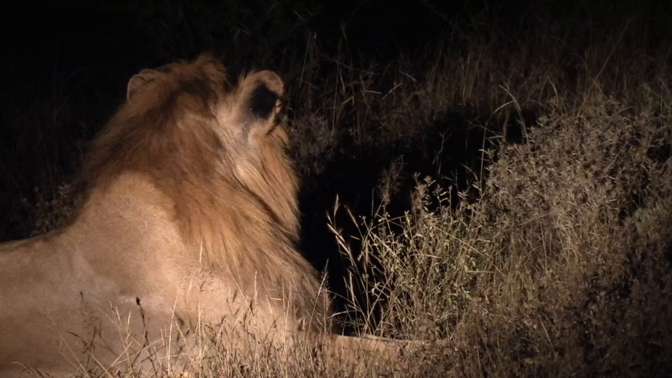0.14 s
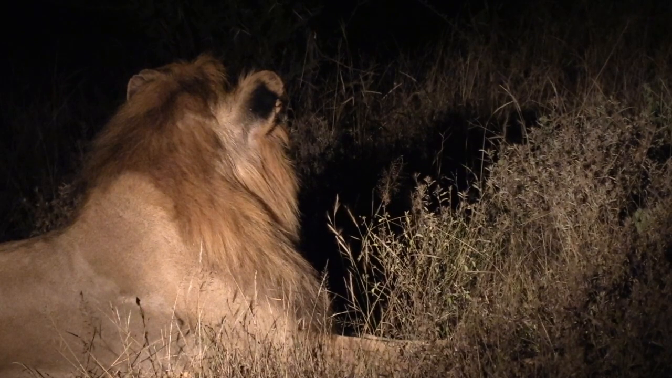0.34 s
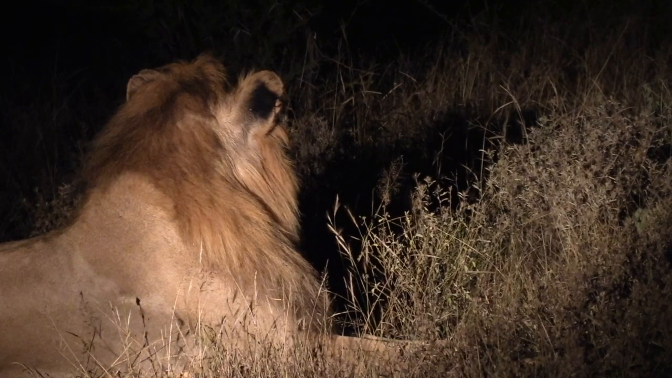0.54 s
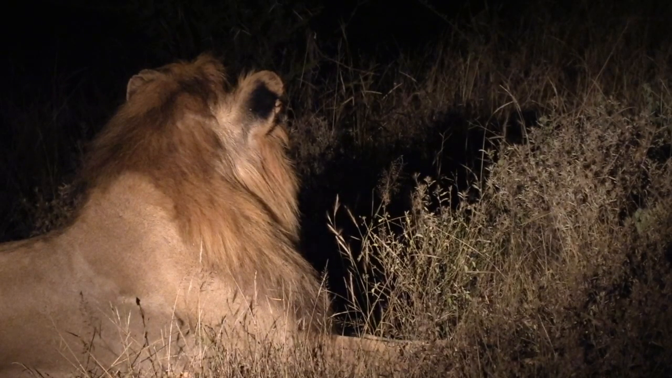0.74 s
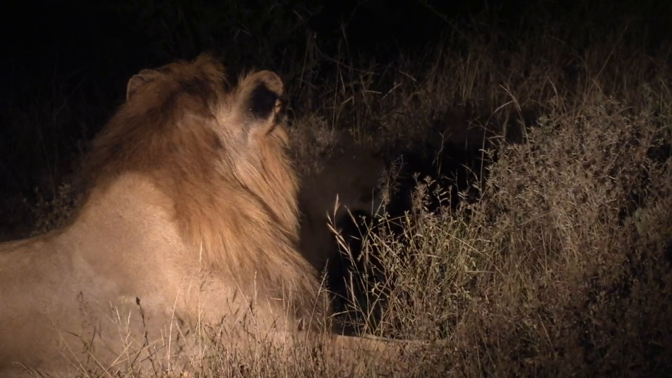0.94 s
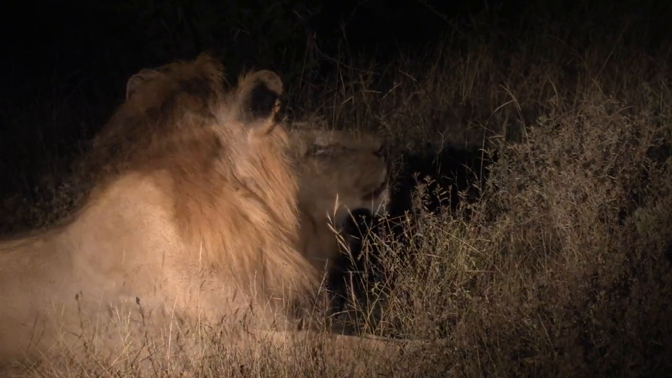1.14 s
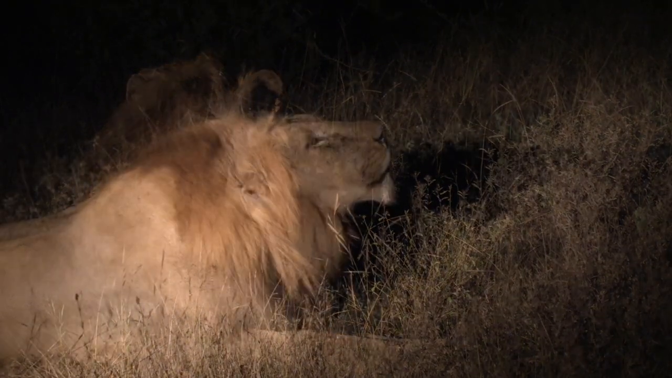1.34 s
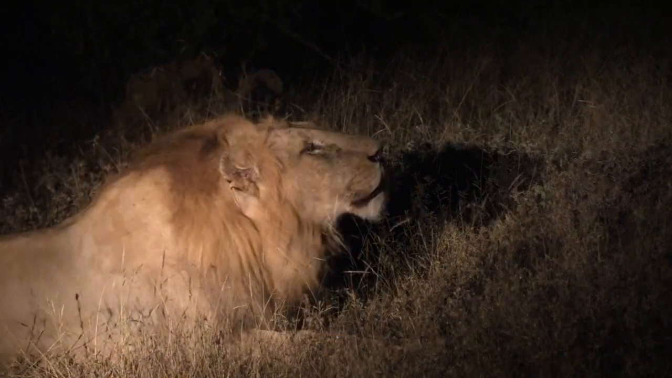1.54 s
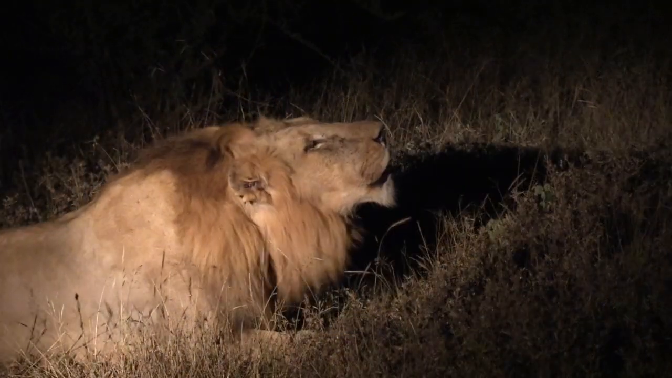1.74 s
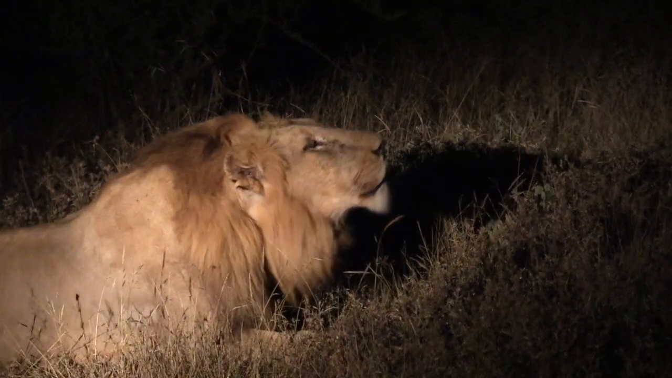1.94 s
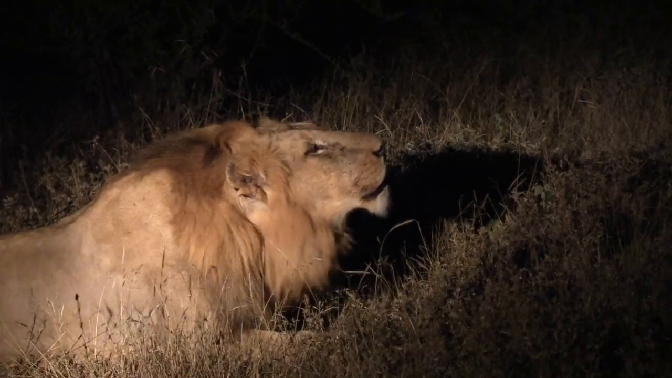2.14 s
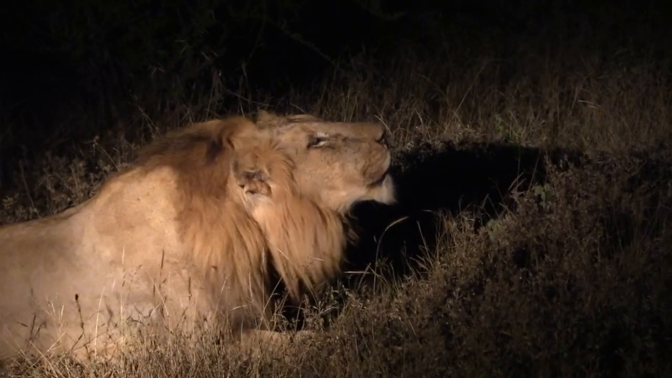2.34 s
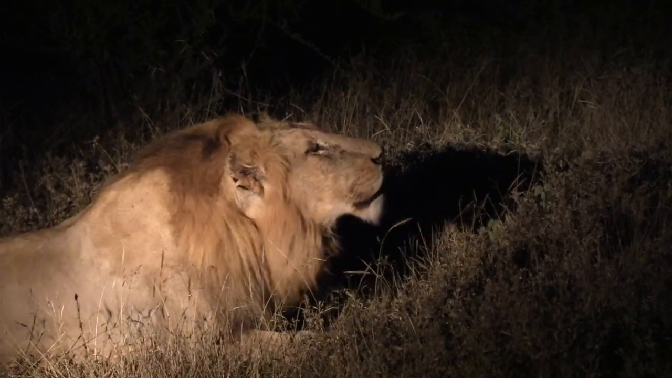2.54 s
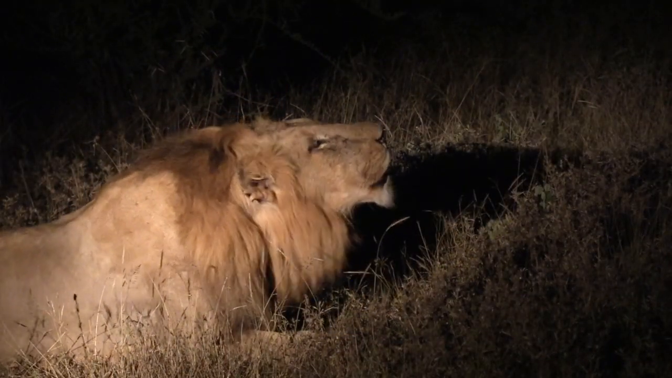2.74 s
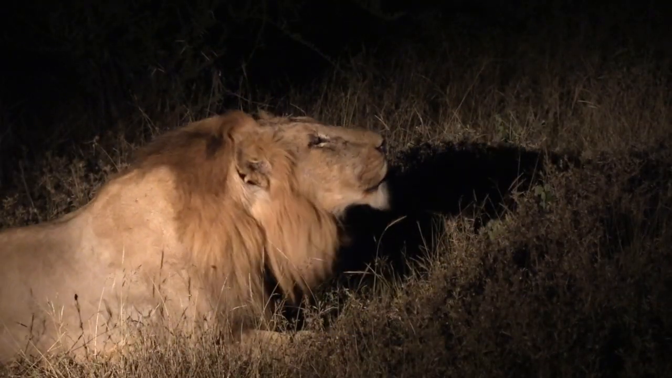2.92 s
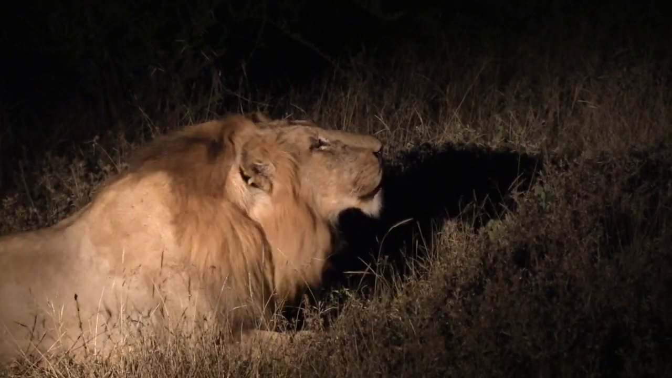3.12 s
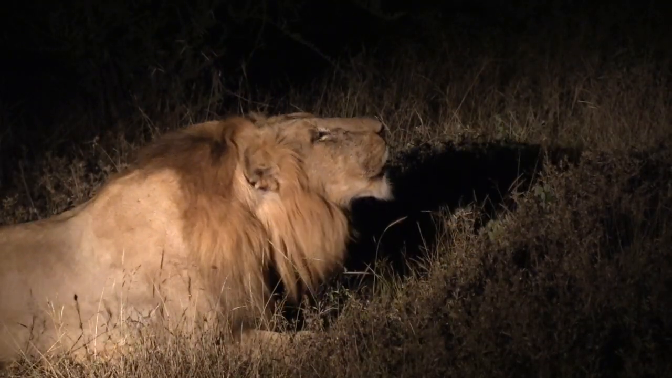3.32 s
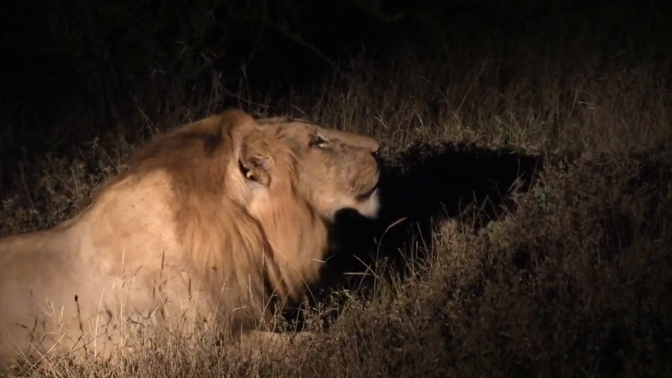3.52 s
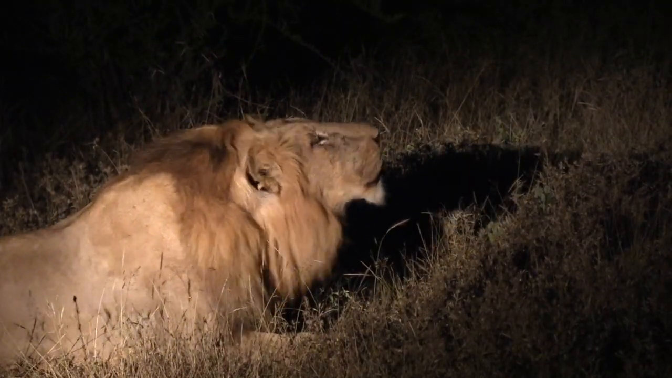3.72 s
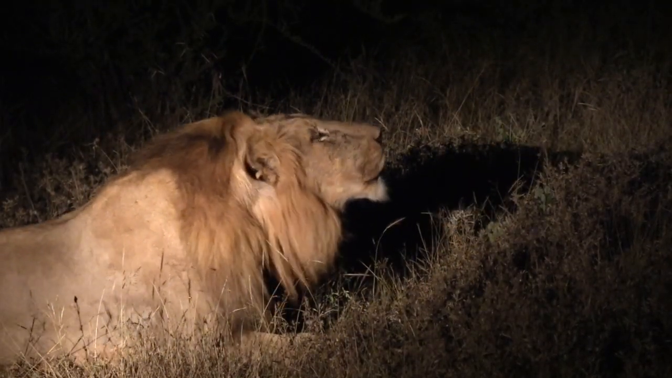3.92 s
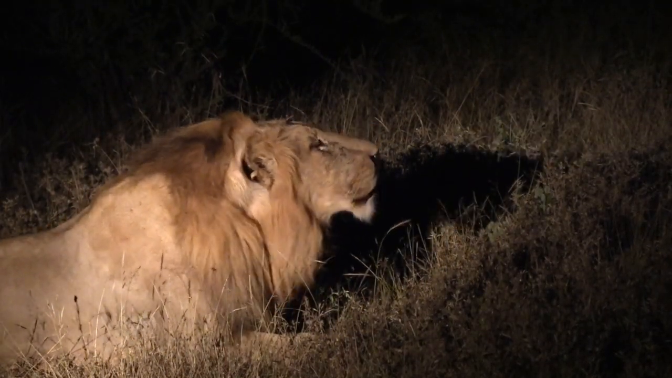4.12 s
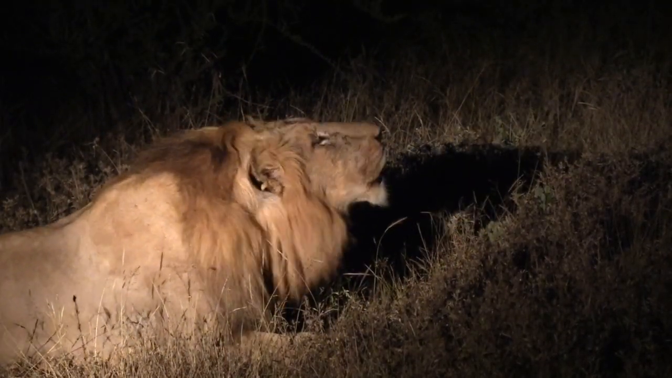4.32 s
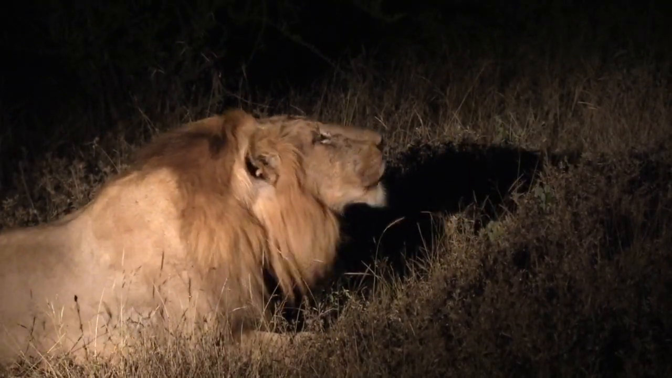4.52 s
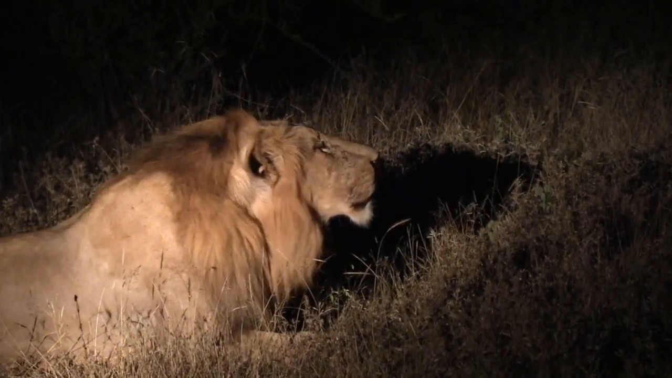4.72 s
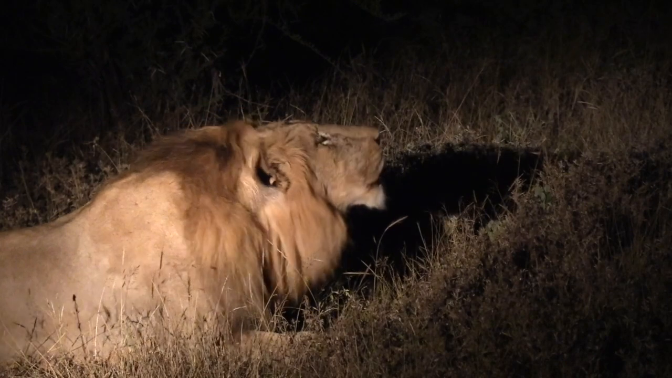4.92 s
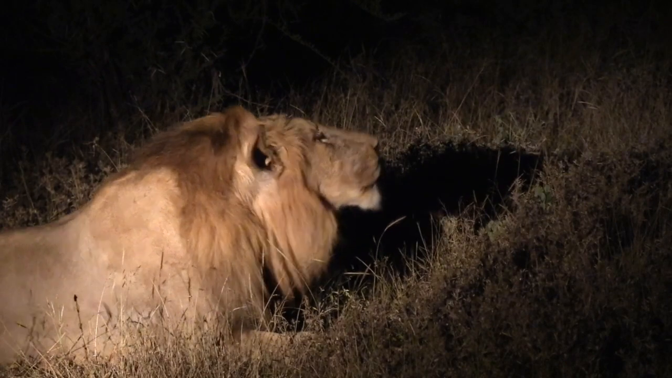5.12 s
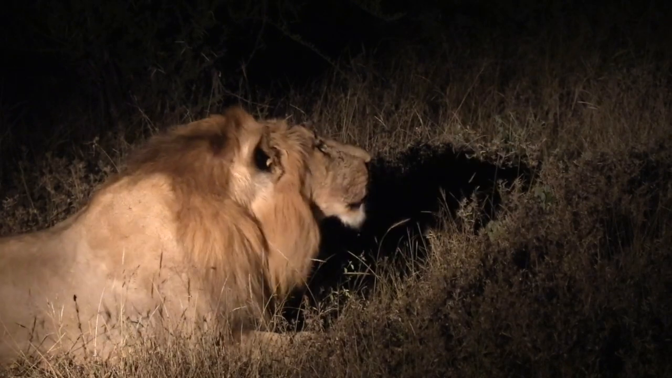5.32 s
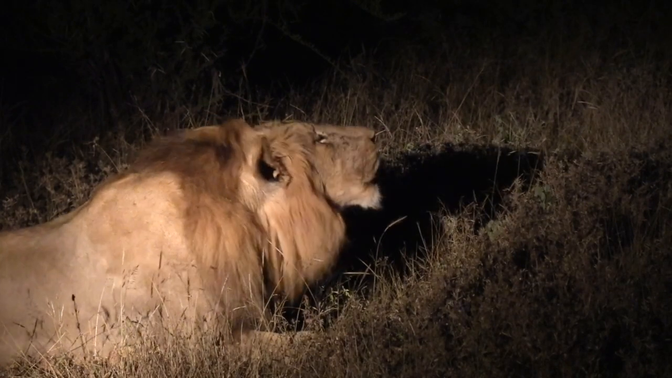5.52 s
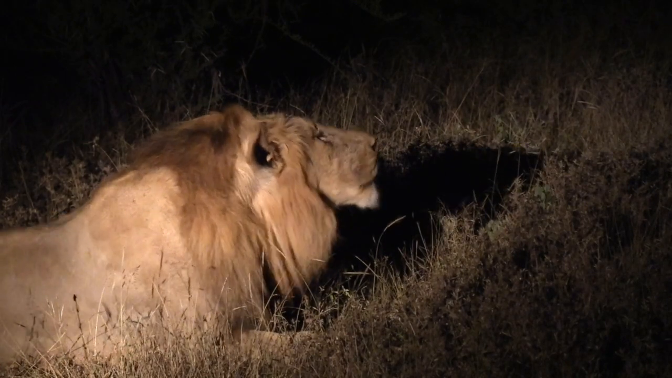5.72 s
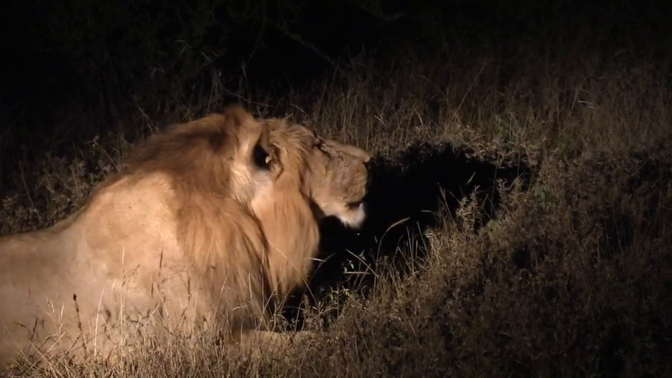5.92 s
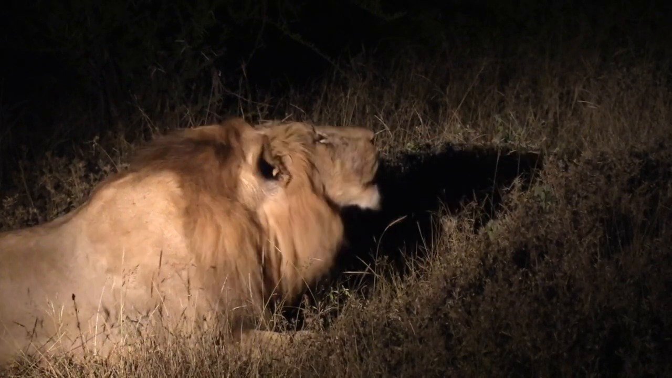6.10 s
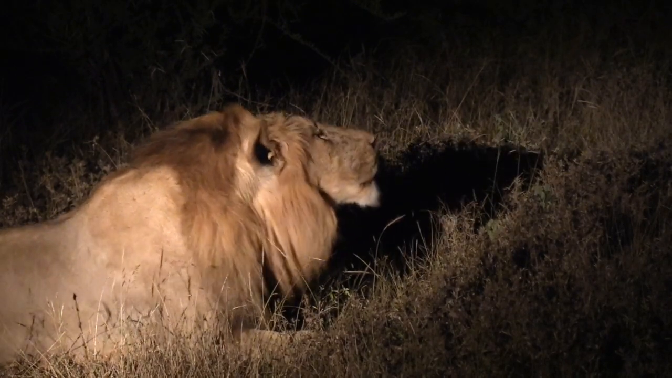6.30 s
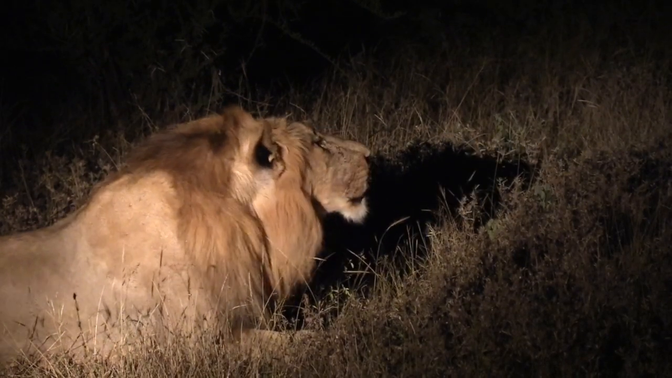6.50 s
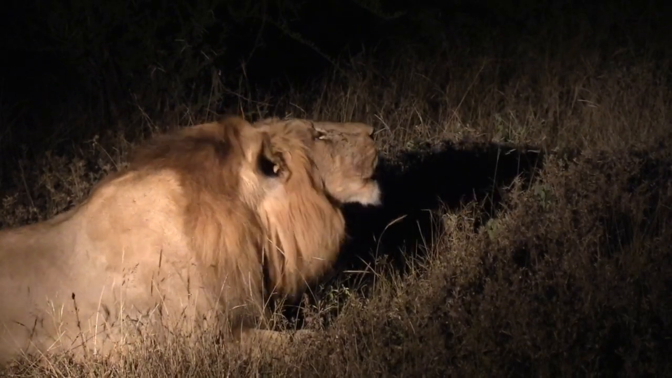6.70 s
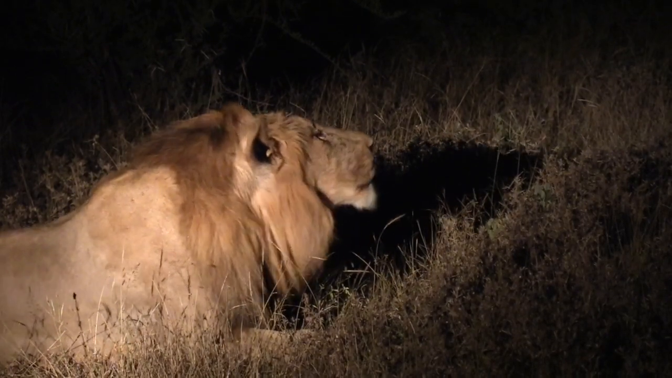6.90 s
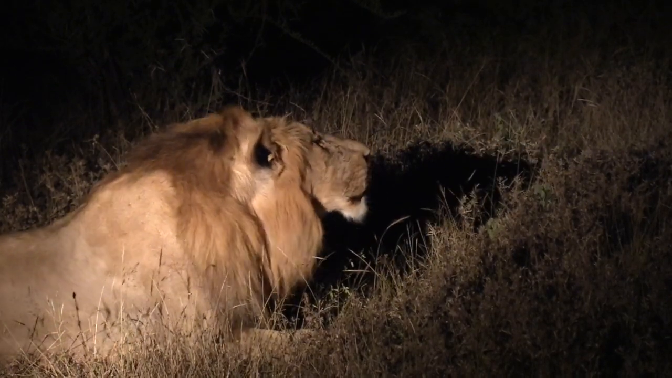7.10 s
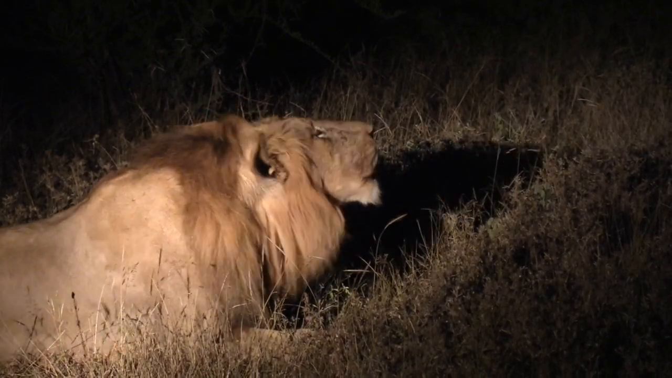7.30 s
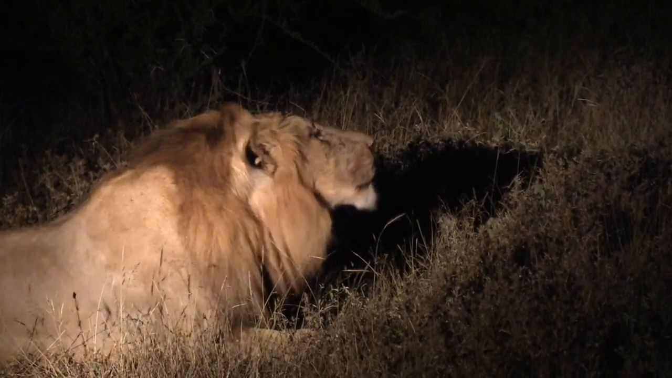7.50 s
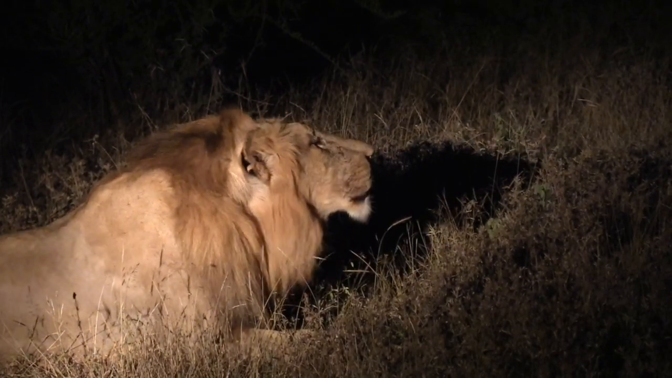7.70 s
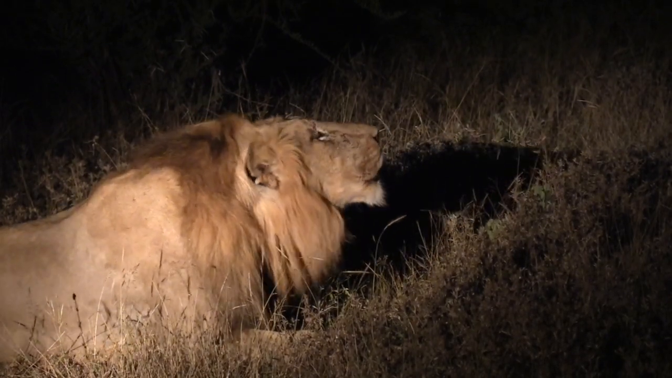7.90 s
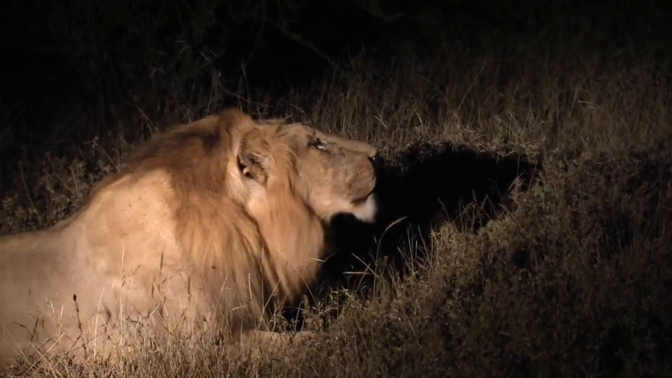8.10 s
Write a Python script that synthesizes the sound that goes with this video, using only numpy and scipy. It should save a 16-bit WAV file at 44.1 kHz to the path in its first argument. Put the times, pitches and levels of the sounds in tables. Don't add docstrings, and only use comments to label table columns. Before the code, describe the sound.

Quiet dark bush with a dying engine and faint insect rasps, then thirteen short deep lion grunts, two a second, amid louder night insects and bird whistles.

```python
import sys
import numpy as np
from scipy import signal
from scipy.fft import rfft, irfft, next_fast_len
from scipy.io import wavfile
from scipy.ndimage import uniform_filter1d

SR = 44100
rng = np.random.default_rng(int(sys.argv[2]) if len(sys.argv) > 2 else 0)


def undo_db(level):
    steps = np.asarray(level, float) / 20
    return 10 ** steps


def to_wav(sig):
    pcm = np.clip(np.atleast_2d(sig), -1, 1) * 32767
    pcm = np.round(pcm).astype(np.int16)
    wavfile.write(sys.argv[1], SR, pcm.T)


N = 359415
T = np.arange(N) / SR
SIZE = next_fast_len(N + SR)
HZ = np.arange(SIZE // 2 + 1) * SR / SIZE


def filtered(x, response):
    return irfft(rfft(x, SIZE) * response, SIZE)[..., :N]


def resonance(hz, width):
    return 1 / (1 + 1j * (HZ ** 2 - hz ** 2) / (width * HZ + 1e-9))


def evened(x, over_s):
    return x / np.sqrt(uniform_filter1d(x[0] ** 2, int(over_s * SR)) + 1e-12)


def drift(rate_hz):
    slow = filtered(rng.standard_normal(N), 1 / (1 + (HZ / rate_hz) ** 2))
    return slow / slow.std()


def left_right(mid_side):
    mid, side = mid_side
    return np.array([mid + side, mid - side])


def panned(x, pan_db):
    return x * undo_db(np.array([[.5], [-.5]]) * pan_db)


def place(length, s):
    at = slice(int(s * SR), min(N, int((s + length) * SR)))
    return at, T[at] - T[at.start]


def bush(x, t60, dull_hz):
    decay = np.exp(-np.log(1000) * T[:SR] / t60) * (T[:SR] > .008)
    returns = rng.standard_normal((2, SR)) * decay / np.sqrt(np.sum(decay ** 2))
    return filtered(x, rfft(returns, SIZE) / (1 + 1j * HZ / dull_hz))


def air(spectrum, level_db):
    hz, db = np.transpose(spectrum)
    colour = undo_db(np.interp(np.log(HZ + 1), np.log(hz), db))
    hiss = filtered(rng.standard_normal(N), colour)
    return undo_db(level_db + 0.23 * drift(24)) * hiss / hiss.std()


# (frequency [Hz], level [dB per Hz])
QUIET_MIDDLE = [(15, -54), (25, -13), (496, -13.5), (2070, -6.5), (3010, -7.5), (3450, 3), (3840, -12),
                (5590, -7), (6400, -15.5), (15600, -20)]
QUIET_SIDES = [(15, -67), (25, -42), (723, -4), (972, 1), (1960, -13), (3450, -7), (4630, -16), (5450, -1),
               (6400, -19), (15600, -28)]
LOUD_MIDDLE = [(15, -46), (25, -5), (82, -17.5), (144, -8.5), (510, -12), (632, -5.5), (2010, -2),
               (3450, -0.5), (4050, -6.5), (5020, -3.5), (5590, -8.5), (15600, -19.5)]
LOUD_SIDES = [(15, -54), (25, -34), (210, -16), (999, 2.5), (2010, -11.5), (2930, -25), (3450, -20),
              (4050, -12), (4890, -8), (5590, -17), (8160, -20.5), (15600, -31.5)]
# (pitch [Hz], width [Hz], throbs [per s], level when quiet [dB], level when loud [dB],
# left-right likeness [-1 to 1])
CHORUSES = [
    (3536, 80, 53, -77, -62.5, -0.69),
    (5600, 140, 60, -78.5, -90, -.3),
    (2300, 110, 19, -77.5, -60, -0.83),
    (3336, 350, 47, -89, -58.5, -0.79),
    (1070, 280, 14, -78, -61, -1.03),
    (5100, 210, 17, -81.5, -89, 0.49),
]


def night(quiet, loud):
    mid = quiet * air(QUIET_MIDDLE, -65.5) + loud * air(LOUD_MIDDLE, -53)
    side = quiet * air(QUIET_SIDES, -61) + loud * air(LOUD_SIDES, -49.5)
    out = np.array([mid, side])
    for hz, width, rate, quiet_db, loud_db, alike in CHORUSES:
        beat = np.cumsum(rate * (1 + .15 * drift(3))) / SR
        throb = np.exp(1.2 * np.sin(2 * np.pi * beat) + .15 * drift(4))
        voices = filtered(throb * rng.standard_normal((2, N)), resonance(hz, width) ** 2)
        share = np.sqrt(1 + np.clip(alike, -1, 1) * np.array([[1], [-1]]))
        level = quiet * undo_db(quiet_db) + loud * undo_db(loud_db)
        out += level * share * voices / voices.std()
    return out


# (time [s], level [dB])
ENGINE_LEVELS = [
    (0.0, -64.5),
    (0.184, -69.5),
    (0.45, -93),
]


def engine():
    s, db = np.transpose(ENGINE_LEVELS)
    turn = np.floor(np.cumsum(100 * (1 + 0.135 * drift(42))) / SR)
    knocks = np.diff(turn, prepend=0) * undo_db(3.1 * drift(50))
    body = resonance(100, 28) - .5 * resonance(165, 66)
    body = body + 0.32 * resonance(344, 53) - 0.093 * resonance(480, 70)
    hum = evened(filtered(knocks * [[1], [.5]], body), .08)
    return undo_db(np.interp(T, s, db, right=-120)) * hum


# (time [s], peak level [dB], pitch [Hz])
DRY_TICKS = [
    (.002, -50.5, 750),
    (.425, -52.5, 1360),
    (0.43, -53, 2150),
    (1.271, -49, 2400),
]


def ticks():
    out = np.zeros((2, N))
    for s, db, hz in DRY_TICKS:
        at, t = place(.03, s)
        burst = 0.54 * rng.standard_normal((2, len(t))) * np.exp(-t / .0015)
        ring = np.sin(2 * np.pi * hz * t) + burst
        out[:, at] += undo_db(db) * np.exp(-t / 0.0058) * ring * [[1], [.4]]
    return out


# (first rasp [s], rasps [per s], level [dB], fading [dB per s])
KATYDID_BEAT = (.052, 11.33, -61.5, 2.5)
# (time [s], level [dB])
STRESSED_RASPS = [
    (.19, -56),
    (.408, -64),
    (1.026, -65),
    (1.292, -66),
]


def katydid():
    first, rate, level_db, fading = KATYDID_BEAT
    steady = [(first + k / rate, level_db - fading * k / rate) for k in range(15)]
    rasps = np.zeros(N)
    for s, db in steady + STRESSED_RASPS:
        at, t = place(.04, s)
        rasps[at] += undo_db(db + 2.5) * np.sin(np.pi * t / .04)
    return filtered(rasps * rng.standard_normal((2, N)), resonance(10200, 1900) ** 2)


# (time [s], chirps, level [dB], left over right [dB])
CRICKET_TRILLS = [
    (1.708, 17, -55, 7),
    (4.83, 11, -57.5, 22.5),
    (5.917, 12, -55, -23.5),
    (7.68, 12, -56.5, 19.5),
]
STEADY_CHIRPS = [1.98, 2.28, 2.55, 2.87, 3.17, 3.62, 3.94, 4.25, 4.55, 4.85, 5.2, 5.44, 5.72, 5.99, 6.285,
                 6.59, 6.92, 7.25, 7.55, 7.8]


def crickets():
    trill_rate, chirp_rate = 45.8, 27
    out, flicker = np.zeros((2, N)), undo_db(2 * drift(23))
    for s, strokes, db, pan_db in CRICKET_TRILLS:
        at, t = place(round(strokes) / trill_rate, s)
        u = t * trill_rate % 1 / trill_rate
        swell = np.sin(np.pi * np.clip(u / 0.012, 0, 1))
        stroke = swell * np.sin(2 * np.pi * (5200 * u - 36000 * u ** 2))
        fade_in = np.minimum(t / 0.019, 1)
        out[:, at] += panned(undo_db(db + 2.5) * fade_in * flicker[at] * stroke, pan_db)
    for s in STEADY_CHIRPS:
        at, t = place(4 / chirp_rate, s)
        swell = np.sin(np.pi * np.clip(t * chirp_rate % 1 / 0.64, 0, 1))
        wobble = 1.9 * np.sin(2 * np.pi * chirp_rate * t)
        out[:, at] += panned(undo_db(-55.5) * swell * np.sin(2 * np.pi * 5000 * t + wobble), 1.5)
    return out + undo_db(-18.0) * bush(out[0], 0.22, 8000)


def whistle(t, pitch_hz, db):
    ends = np.clip(np.minimum(t, t[-1] - t) / .008, 0, 1)
    return undo_db(db + 2.5) * ends * np.sin(2 * np.pi * np.cumsum(pitch_hz) / SR)


# (time [s], climb [s], first pitch [Hz], bend [power], level [dB])
LONG_NOTES = [
    (2.12, 0.18, 1420, 1.05, -57),
    (2.785, 0.13, 1420, 2.1, -55),
    (6.96, .14, 1580, 1.2, -52.5),
    (7.6, 0.13, 1493, 3.4, -54),
]
# (time [s], length [s], top pitch [Hz], level [dB])
SHORT_NOTES = [(1.711, 0.063, 1896, -60), (2.652, 0.058, 1936, -58), (2.991, 0.051, 1870, -51.5),
               (3.072, .06, 1855, -53), (3.147, .058, 1785, -57), (3.215, 0.049, 1750, -57),
               (3.274, 0.056, 1660, -60), (6.499, 0.069, 1910, -53), (7.783, 0.083, 1890, -54),
               (7.876, 0.067, 1860, -55)]


def nightjar():
    top_hz, drop_s, drop_hz_per_s, swell_db = 2010, 0.044, 12300, 8.5
    out = np.zeros(N)
    for s, climb, first_hz, bend, db in LONG_NOTES:
        at, t = place(climb + drop_s, s)
        left = np.maximum(1 - t / climb, 0) ** bend
        over = np.maximum(t - climb, 0)
        hz = top_hz - (top_hz - first_hz) * left - drop_hz_per_s * over
        weaker = swell_db * (np.abs(2 * left - 1) - over / drop_s)
        out[at] += whistle(t, uniform_filter1d(hz, size=300), db - weaker)
    for s, length, arch_hz, db in SHORT_NOTES:
        at, t = place(length, s)
        out[at] += whistle(t, arch_hz - 1700 * np.abs((t / length) ** 1.26 - .5) ** 2, db)
    out *= undo_db(2.2 * drift(27))
    return panned(out, 13.0) + undo_db(-3) * bush(out, 0.24, 2700)


def folds(pitch_hz, jitter, shimmer_db, soft_hz):
    phase = np.cumsum(pitch_hz * (1 + jitter * drift(39.91))) / SR
    closes = np.diff(np.floor(phase), prepend=0) > 0
    puffs = closes * undo_db(shimmer_db * drift(52)) * np.sqrt(SR / pitch_hz)
    pulses = filtered(puffs, 1 / (1 + 1j * HZ / soft_hz))
    swell = 1 + .5 * np.cos(2 * np.pi * phase)
    hiss = rng.standard_normal(N) * swell * undo_db(shimmer_db * drift(22))
    return pulses, hiss


def tract(source, modes, age=0):
    early, late = 0, 0
    for k, (hz, width, early_db, late_db, side_db, lag) in enumerate(modes):
        side = undo_db(side_db) * np.exp(-2j * np.pi * lag * HZ / hz)
        peak = (-1) ** k * resonance(hz, width) * np.array([HZ ** 0, side])
        early = early + undo_db(early_db) * peak
        late = late + undo_db(late_db) * peak
    return (1 - age) * filtered(source, early) + age * filtered(source, late)


def bent(x, share):
    slip = signal.lfilter([1], [1, -np.exp(-3 / SR)], share) / SR
    return np.array([np.interp(T + slip, T, channel) for channel in x])


# (time [s], jump [dB])
FOLD_SLAPS = [(1.4, 3), (1.518, 20), (1.84, 4.5), (2.437, 9), (2.507, 17), (2.844, 7), (2.956, 0),
              (3.366, 7.5), (3.533, 14), (3.877, 7), (3.963, 5.5), (4.034, 10), (4.444, 3), (4.523, 7.5),
              (4.594, 15.5), (5.142, 9), (5.17, 7), (5.192, 16), (5.711, 10.5), (6.243, 3.5), (6.322, 11.5),
              (6.348, 5.5), (6.374, 11.5), (6.785, 5), (6.824, 8.5), (6.928, 5), (7.399, 2), (7.511, 12),
              (7.951, 3.5), (8.08, 11.5)]


def slapping():
    out = np.zeros(N)
    for s, jump_db in FOLD_SLAPS:
        at, t = place(.06, s - .03)
        since = t - .03
        out[at] += jump_db * np.where(since > 0, .65 * np.exp(-since / .009), -.6 * np.exp(since / .006))
    return uniform_filter1d(out, size=8)


# (time [s], rise [s], push level [dB], growl under the push [dB], length [s])
GRUNT_EVENTS = [(1.312, .085, -35, -11, .2), (1.811, 0.073, -27.5, -15.5, 0.21),
                (2.307, 0.068, -25.5, -11.5, .2), (2.813, 0.067, -25, -12, .2),
                (3.323, 0.068, -26.5, -10, .2), (3.846, 0.066, -24, -14, .2),
                (4.406, 0.071, -22.5, -11.5, .2), (5.002, 0.075, -23, -15, 0.21),
                (5.603, 0.076, -23.5, -14, 0.22), (6.194, 0.068, -24.5, -11, .2),
                (6.763, 0.075, -26.5, -12, 0.21), (7.359, 0.072, -25, -11, 0.21),
                (7.914, .072, -26.5, -12.5, 0.19)]


def per_grunt(rows):
    begins = [grunt[0] - .1 for grunt in GRUNT_EVENTS]
    return np.array(rows)[np.maximum(np.searchsorted(begins, T) - 1, 0)].T


def effort(push_db, lag_s, start_db, growl_db):
    start, rise, level_db, under_db, length = per_grunt(GRUNT_EVENTS)
    t, top = T - start, rise + lag_s
    after = np.maximum(t - top, 0)
    swell = -start_db * np.maximum(1 - t / top, 0) ** 1.43 - 1500 * np.maximum(-t, 0)
    push = push_db - 14.5 * (after / 0.052) ** 0.72
    close_s, sag_db_per_s, close_db_per_s, shut_db_per_s = 0.036, 57, 345, 500
    closing = close_db_per_s * np.maximum(t - length + close_s, 0)
    growl = growl_db + under_db - sag_db_per_s * after - closing
    shut = shut_db_per_s * np.maximum(t - length - close_s, 0)
    both = 10 * np.log10(undo_db(2 * push) + undo_db(2 * growl) + 1e-30)
    return np.maximum(level_db + swell - shut + both, -120)


# (pitch [Hz], width [Hz], level as a grunt starts [dB], # level as it ends
# [dB], sides against middle [dB], side lag [cycles])
CHEST_MODES = [(140, 14, 0, 0, -13, .12), (118, 30, -17, -13, -13, .1), (172, 35, -19, -17, -13, .12)]
THROAT_MODES = [(217.5, 78, -13.5, -3, -22, 0.3), (365, 11.6, 9, 6.5, -8, 0.75),
                (402.7, 24.2, 4.5, -6, -17, 0.91), (498, 36, -2, -6, -14.5, 0.86),
                (545.4, 36.2, -2, -9.5, -10.5, 0.5), (682, 30, -22.5, -14, 1, 0.48),
                (822, 18, -46, -11.5, 4.5, 0.39)]
MOUTH_MODES = [(1011.2, 20, -0.5, 2, -16, 0.58), (1090.4, 42, -1, -5, -9, 0.73),
               (1237, 80, -8.5, -7.5, -8, 0.9), (1419, 43, -8, 4, -16, 0.081),
               (1555, 240, -28, -8, -14, 0.95)]
RASP_MODES = [(1890, 31, 4.5, -30, -0.5, 0.75), (2189, 29, 4.5, 0.5, 1, 0.35),
              (2400, 61, -8, -21.5, -28, 1), (2668, 31, -1.5, -9.5, -13, 0.7),
              (3016, 115, -6, -12.5, -6.5, 0.92), (3586, 74, -5.5, -8, -23, 0.74),
              (4060, 260, -14, -20, -5.5, 0.15), (4850, 62, -9.5, -8.5, -2, 0.75),
              (5730, 340, -12.5, -20.5, -6.5, 0.2), (7140, 3500, -21, -38, -15, 0.33),
              (9760, 2700, -22.5, -44, -14, 0), (12900, 3100, -38, -48, -8, 0)]
# (push [dB], lag [s], drop at the start [dB], growl [dB])
PART_EFFORTS = [
    (2.65, 0.0011, 31, -2.5),
    (2, 0.0025, 23, 2.5),
    (-3.5, 0.0025, 23.5, 7),
    (-14, 0.016, 30, -2.5),
]
# (throat level [dB], mouth opening [dB], throat stretch [share])
POSTURES = [(.3, -0.5, .01), (.3, 1.5, .01), (.3, -0.4, .01), (.3, 0.5, 0.0102), (.3, 0.5, 0.0099),
            (.3, 1.4, 0.009914), (.3, -0.8, 0.01028), (.3, 0.9, 0.0091), (.3, 0.65, .12),
            (.3, -1.2, 0.01016), (.3, 1.4, .05), (.3, -0.1, 0.0103), (.3, 1.3, 0.0097)]


def grunts():
    chest_db, throat_db, mouth_db, rasp_db = [effort(*part) for part in PART_EFFORTS]
    full_db, open_db, tall = per_grunt(POSTURES)
    throat_db, mouth_db = throat_db + full_db, mouth_db + open_db
    rasp_db = rasp_db + 1.33 * open_db
    slap_db = slapping()
    sounding = chest_db > -70
    starts = np.array([grunt[0] for grunt in GRUNT_EVENTS]) - .05
    since = T - starts[np.maximum(np.searchsorted(starts, T) - 1, 0)]
    age = np.clip((since - .1) / .15, 0, 1)
    pulses, hiss = folds(146 - 18 * age, jitter=.09, shimmer_db=3, soft_hz=1500)

    stretch = np.sin(np.pi * age) ** 2 * (.5 - age)
    climb = 0.0596 * (age - .3) * sounding
    throat_bend = 0.55 * stretch + tall * sounding + .03 * drift(9)
    mouth_bend = climb + .025 * drift(9.43)
    rasp_bend = 0.615 * climb + .02 * drift(8.6)

    chest = bent(tract(pulses + .1 * hiss, CHEST_MODES, age), .06 * stretch)
    throat = bent(tract(pulses + 0.87 * hiss, THROAT_MODES, age), throat_bend)
    mouth = bent(tract(0.69 * pulses + 0.8 * hiss, MOUTH_MODES, age), mouth_bend)
    rasp = bent(tract(.5 * pulses + 3.3 * hiss, RASP_MODES, age), rasp_bend)
    out = undo_db(chest_db + .4 * slap_db) * evened(chest, .04)
    out += undo_db(throat_db + .5 * slap_db) * evened(throat, .04)
    out += undo_db(mouth_db + slap_db) * evened(mouth, 0.065)
    out += undo_db(rasp_db + slap_db) * evened(rasp, 0.032)
    return out + slap_knocks(slap_db, mouth_db)


def slap_knocks(slap_db, mouth_db):
    knocks = filtered(np.maximum(np.diff(slap_db, prepend=0), 0) ** 2, 1 / (1 + 1j * HZ / 4000))
    body = resonance(1400, 190) - 0.68 * resonance(1100, 130) + 0.15 * resonance(2300, 300)
    crack = filtered(knocks * undo_db(mouth_db + 19) * [[1], [.25]], body)
    return crack + tract(knocks * undo_db(mouth_db + 12), MOUTH_MODES + RASP_MODES[:6], .7)


GASP_LEVELS = [-72, -60, -53.5, -54, -51, -53.5, -49.5, -54, -56, -59, -53, -52.5, -56]


def gasps():
    low, high = np.zeros(N), np.zeros(N)
    rush = rng.standard_normal(N) * undo_db(1.5 * drift(40)) * [[1], [.3]]
    for (s, *_), db in zip(GRUNT_EVENTS, GASP_LEVELS):
        at, t = place(0.11, s - 0.1197)
        breath = np.sin(np.pi * t / .09)
        low[at] += undo_db(db - 7.5) * breath
        high[at] += undo_db(db) * breath
    throat = evened(filtered(rush, resonance(440, 59)), 0.66)
    mouth = evened(filtered(rush, resonance(1146, 210) - resonance(1460, 210)), 0.5)
    return low * throat + high * mouth


def lion():
    no_bass = signal.butter(5, 90, "high", fs=SR, output="sos")
    return signal.sosfilt(no_bass, grunts() + gasps())


def scene():
    quiet = np.clip((1.56 - T) / 0.69, 0, 1)
    loud = np.clip(1 - (2.55 - T) / 1.56, 0.097, 1)
    cat = lion()
    echoes = undo_db(-27.5) * bush(cat[0], 0.97, 590) + undo_db(-11) * bush(cat[0], 0.066, 4000)
    near = left_right(cat + night(quiet, loud) + engine() + ticks())
    return near + echoes + nightjar() + crickets() + katydid()


def roll_off(x):
    return signal.sosfilt(signal.butter(12, 15710, fs=SR, output="sos"), x)


def record(dry):
    mix = filtered(dry, (HZ < 15700) / np.sqrt(1 + (HZ / 13500) ** 6))
    return roll_off(mix)


dry = scene()
out = record(dry)
to_wav(out)
```